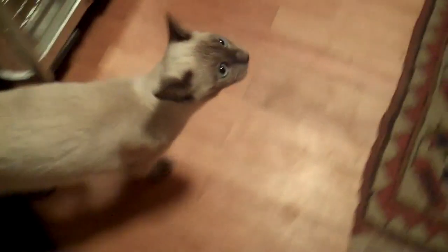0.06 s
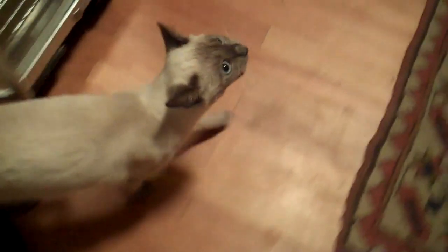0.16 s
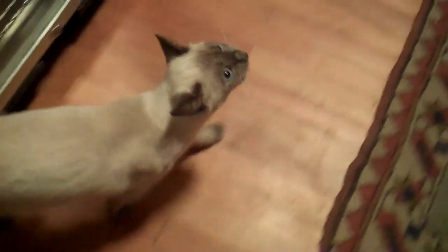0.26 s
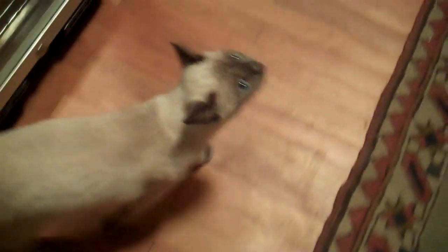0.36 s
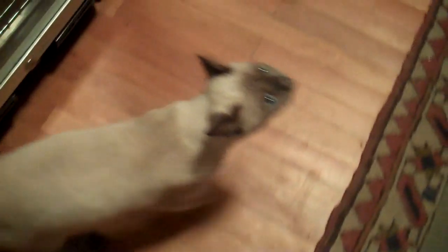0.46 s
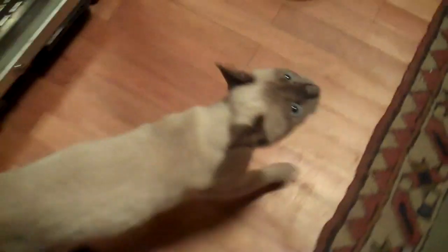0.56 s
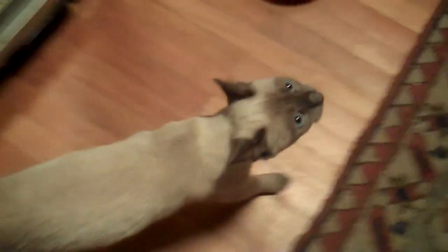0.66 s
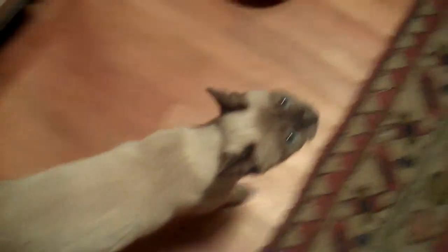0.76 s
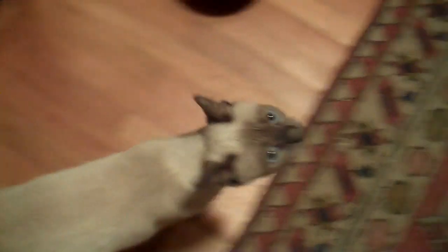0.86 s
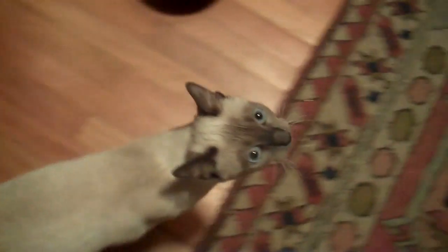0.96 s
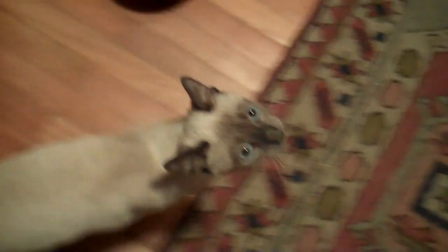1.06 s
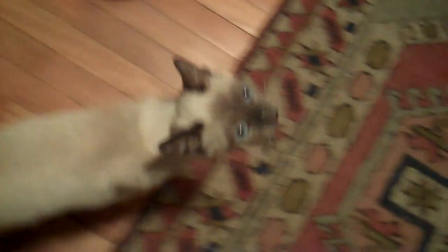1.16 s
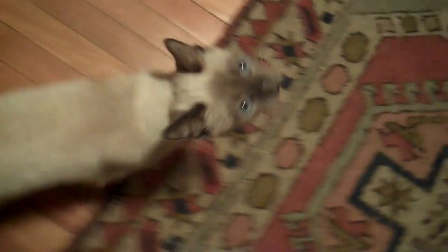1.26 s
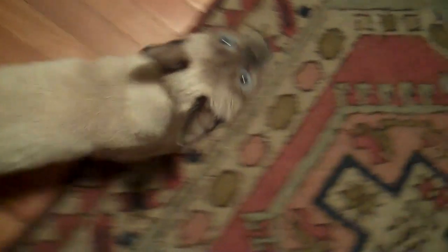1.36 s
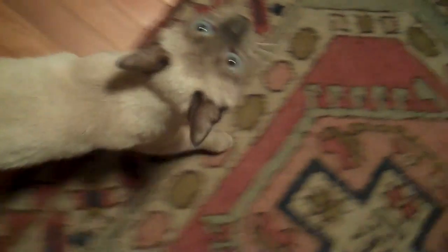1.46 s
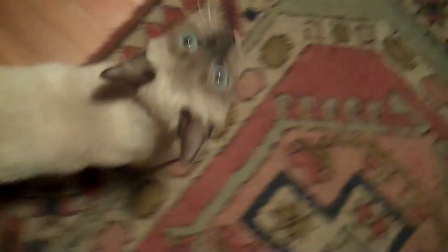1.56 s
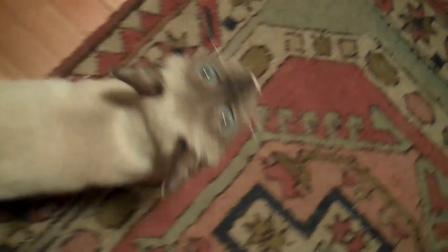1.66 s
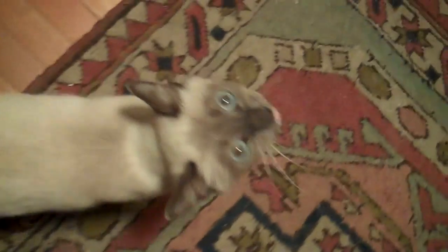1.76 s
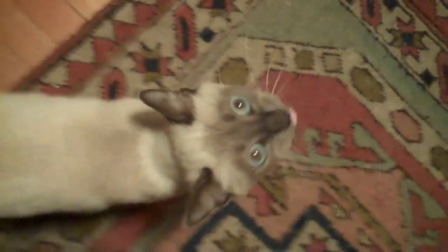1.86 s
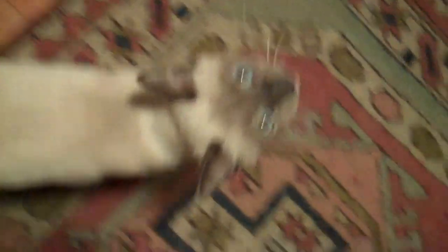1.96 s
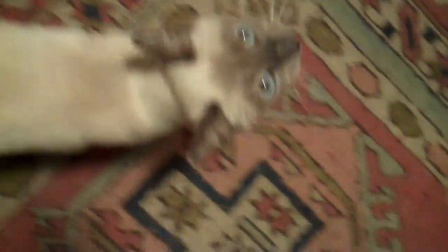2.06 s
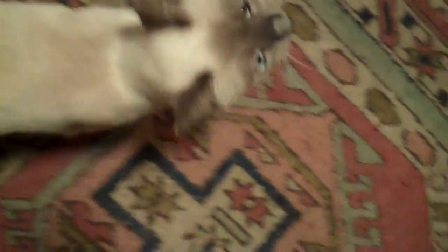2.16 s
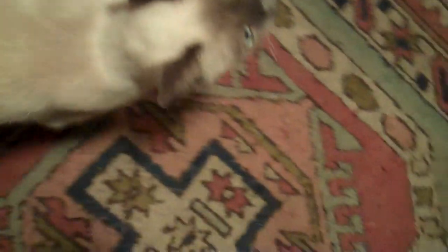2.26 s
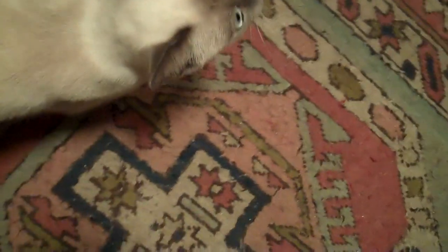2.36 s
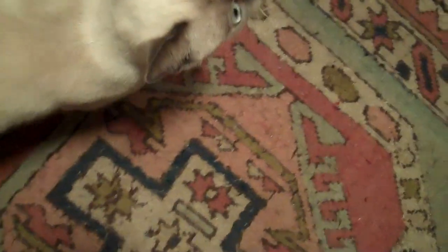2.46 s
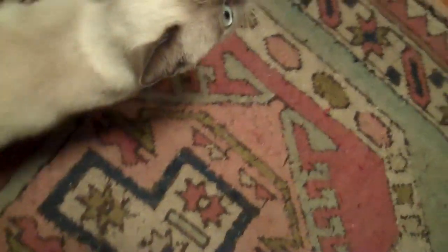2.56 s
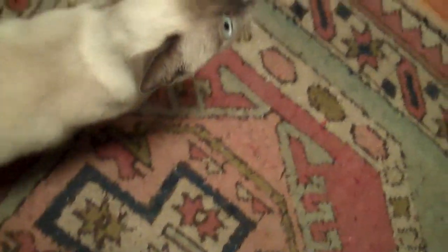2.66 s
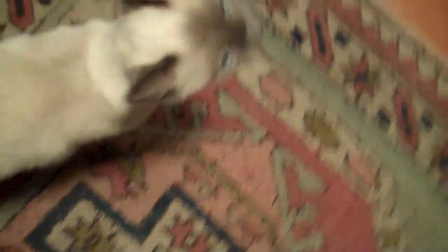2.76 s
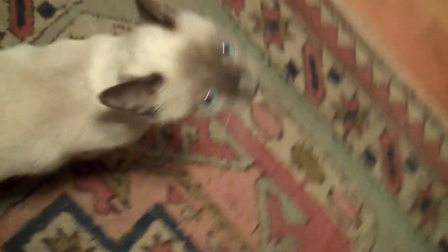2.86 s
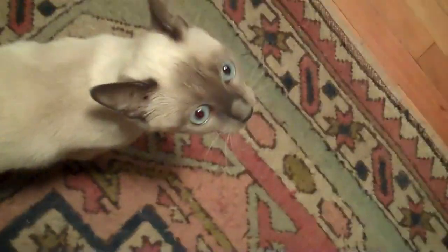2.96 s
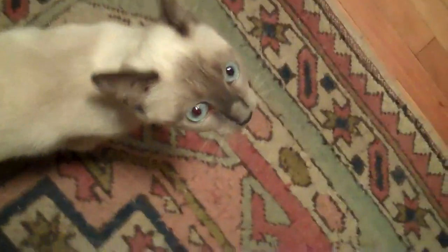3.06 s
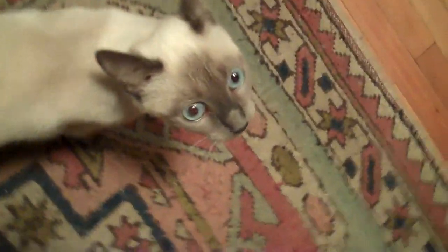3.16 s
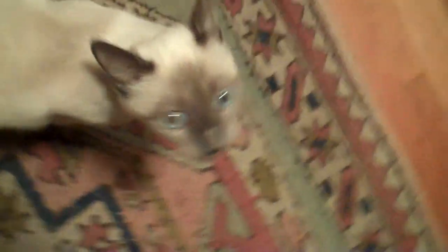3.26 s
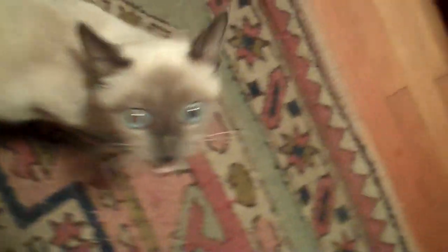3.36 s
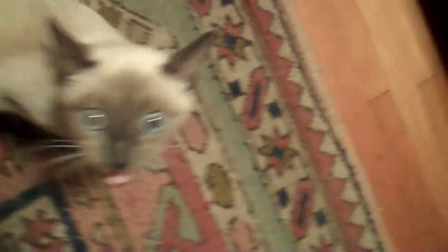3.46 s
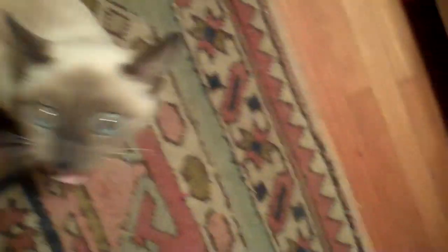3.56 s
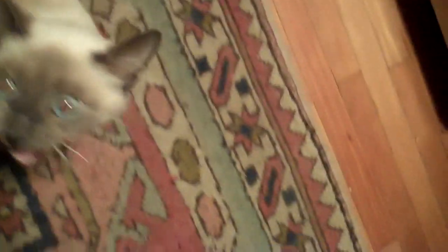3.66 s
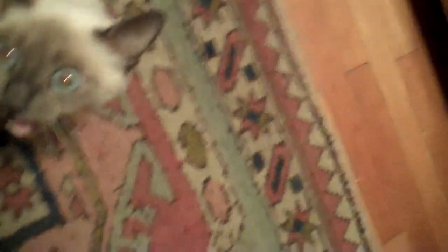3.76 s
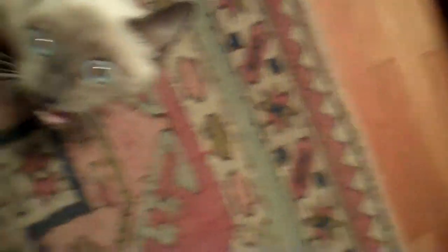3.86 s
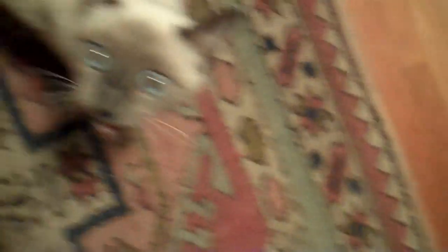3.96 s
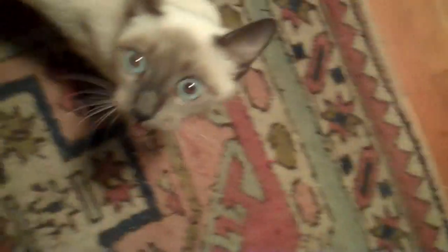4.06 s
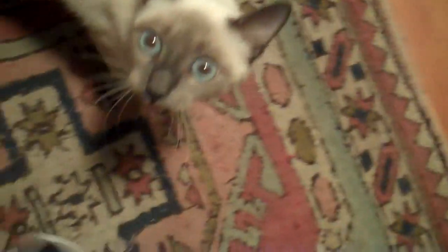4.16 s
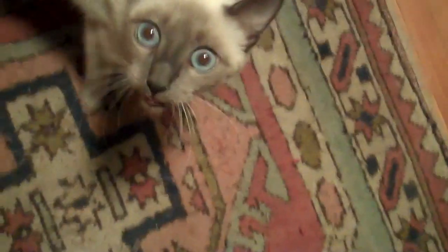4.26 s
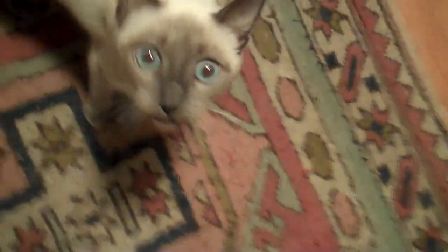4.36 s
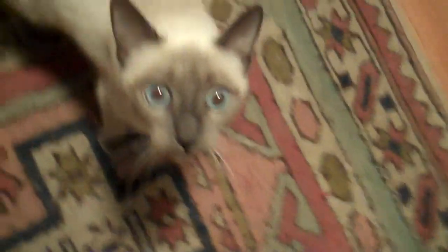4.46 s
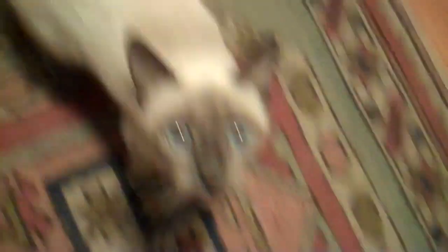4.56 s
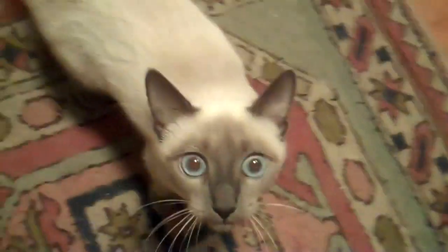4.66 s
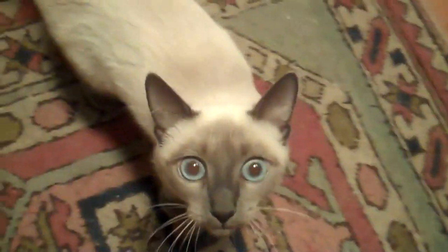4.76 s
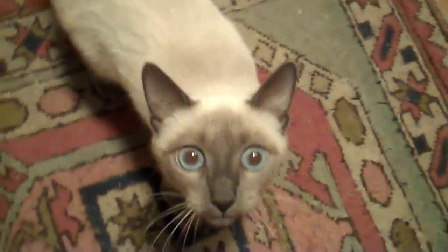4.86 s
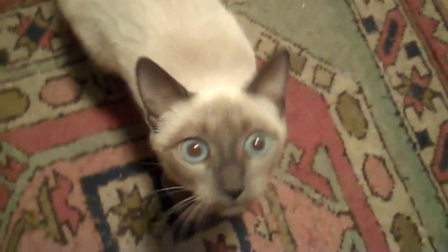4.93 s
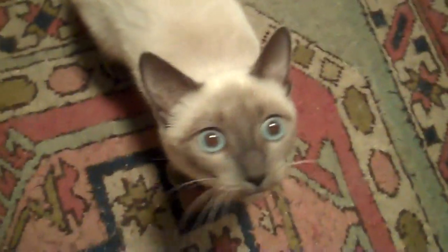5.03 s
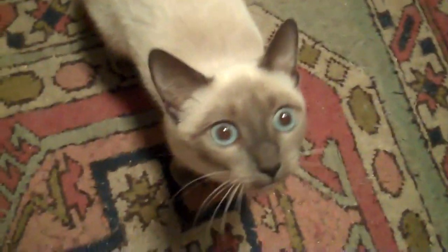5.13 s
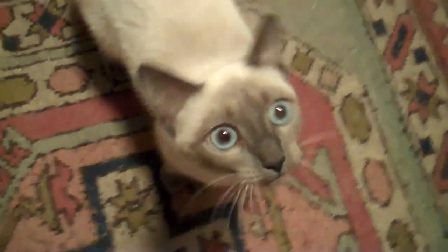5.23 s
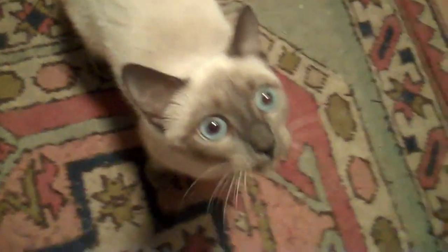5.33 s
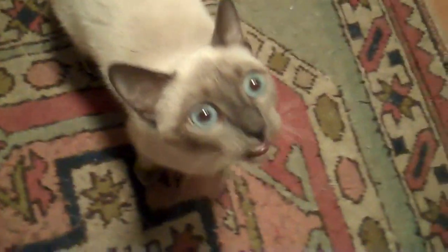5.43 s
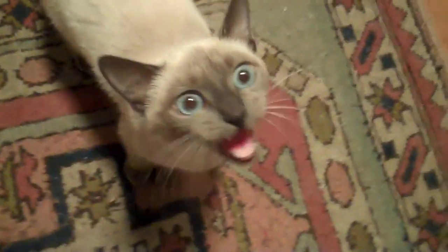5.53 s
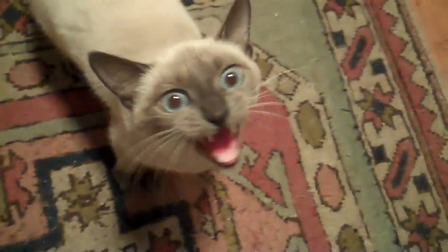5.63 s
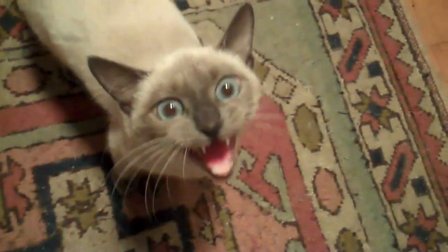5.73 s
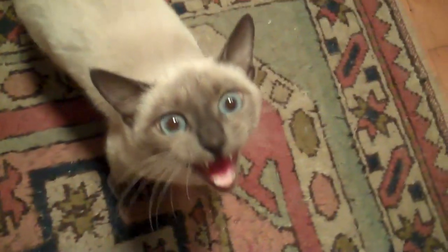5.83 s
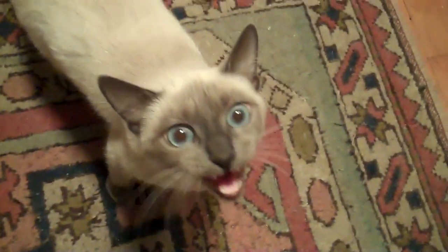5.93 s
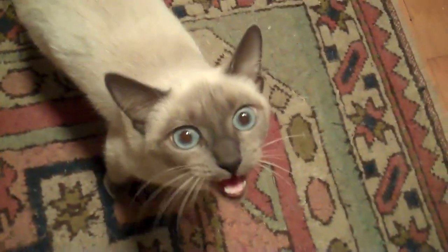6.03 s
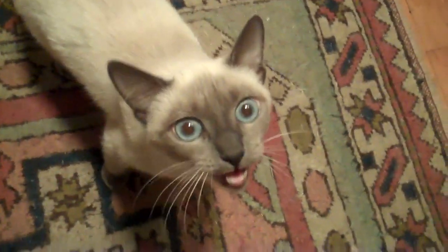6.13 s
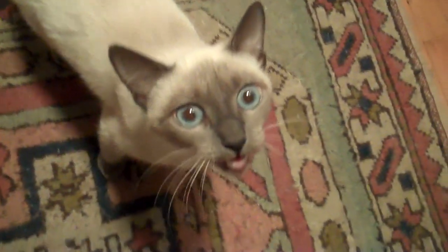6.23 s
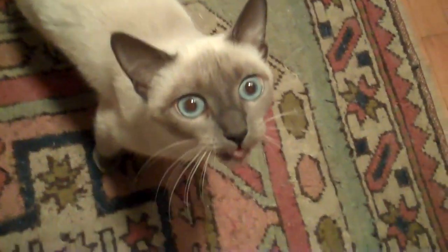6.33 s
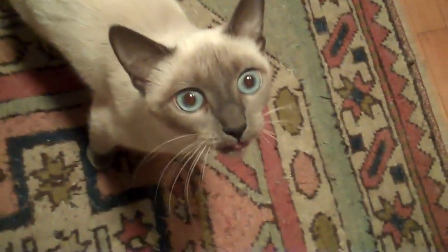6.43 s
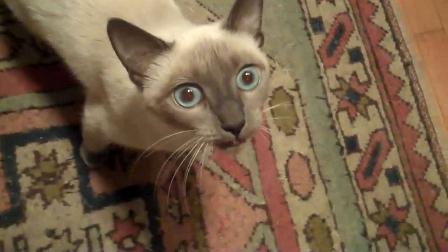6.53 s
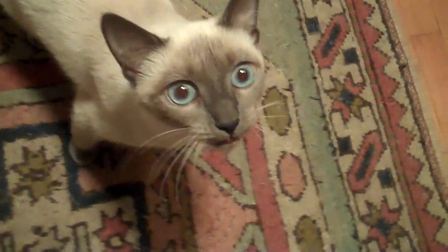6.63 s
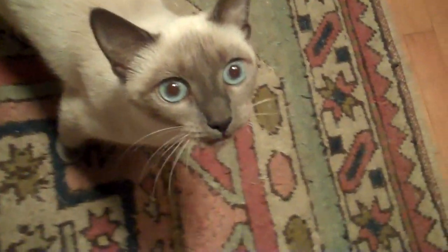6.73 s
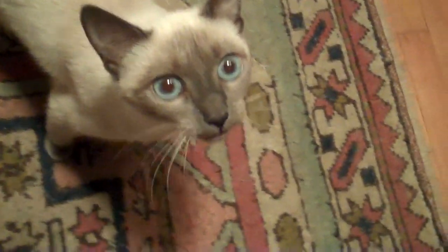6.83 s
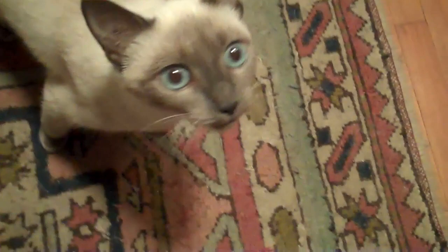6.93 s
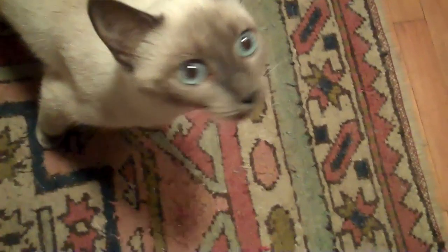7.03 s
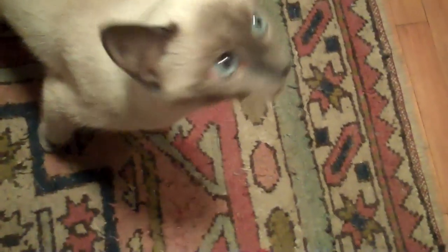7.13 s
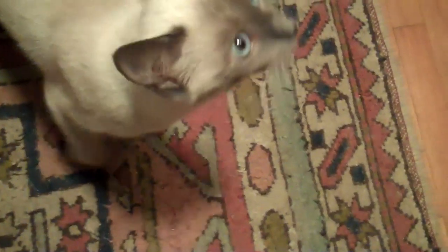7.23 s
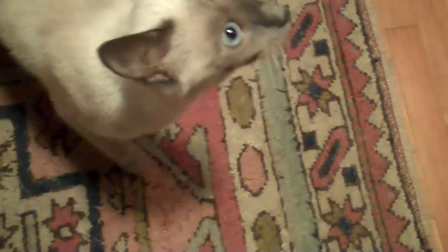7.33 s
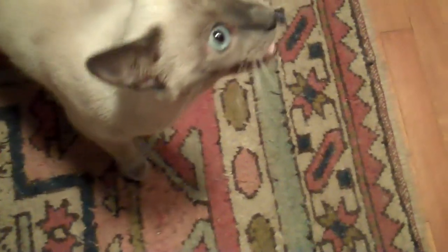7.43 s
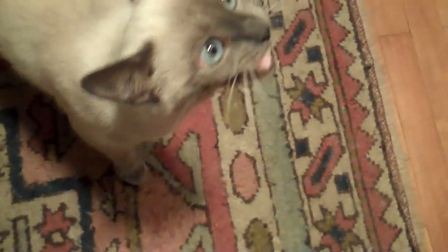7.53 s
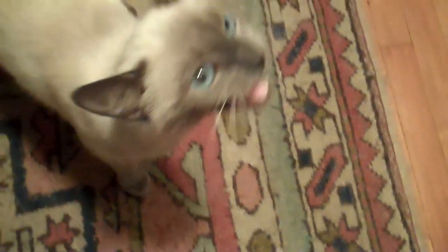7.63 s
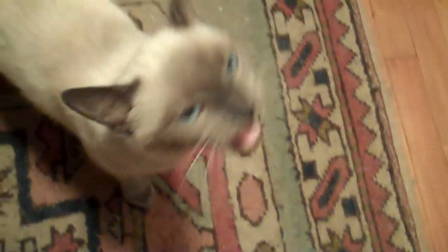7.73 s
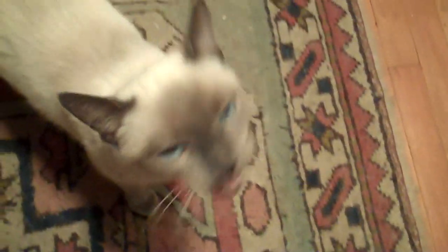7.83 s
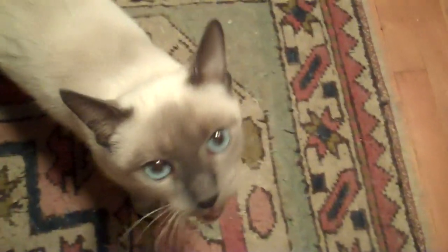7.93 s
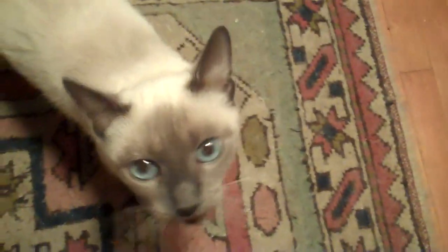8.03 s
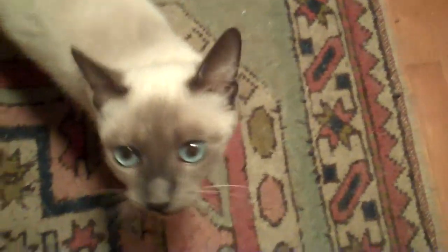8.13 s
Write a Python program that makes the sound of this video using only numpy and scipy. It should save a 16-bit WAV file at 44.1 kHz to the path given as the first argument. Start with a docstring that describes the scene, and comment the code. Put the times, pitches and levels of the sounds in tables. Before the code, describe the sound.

A small quiet room with faint low tone and a steady, airy microphone hiss. After a soft bump at the very start, a nearby cat meows from 0.1 to 1.1 seconds: high, bright and nasal at first, then a long thin whine rising slightly through a nearly closed mouth. Grainy rustles brush by around 0.5 to 0.75, and a dull scuff follows at 1.35. A second, similarly plaintive meow runs from 1.6 to 2.5, ending with a slight crack and a faint bump. After a pause and a tick at 3.4, a louder, fuller meow lasts until 4.35. Tiny rustles and ticks surround its end, and the hiss eases slightly. Another tick comes at 4.7. The fourth meow, 5.6 to 6.45, opens sharply and closes into a whine, followed by a light high tick. A crisp click at 7.5 starts the fifth, rising thinly until 8.2, with brief room reflections.

```python
"""Small, quiet room: a cat meows five times, among soft rustles, scuffs, bumps and ticks.
Each meow is a sum of pitch harmonics through three moving resonances, with puffs of air:
it opens bright and loud, then trails off in a thin whine through a nearly shut mouth.
The small noises are enveloped noise bands. Each meow, and the small noises together, get their own
random reflections with the same decay times. Room tone, faint hum and two microphones' hiss lie underneath."""
import sys
import numpy as np
from scipy import signal
from scipy.fft import rfft, irfft, next_fast_len
from scipy.io import wavfile

SR = 44100
rng = np.random.default_rng(int(sys.argv[2]) if len(sys.argv) > 2 else 0)


def digitize_waveform(pressure):
    """Quantize a signal to 16-bit integers and store it at the path in sys.argv[1].

    Rows of a 2-D input are taken as channels; values are limited to [-1, 1].
    """
    field = np.atleast_2d(pressure).T
    bounded = np.clip(field, -1, 1)
    quanta = np.round(bounded * 32767).astype(np.int16)
    wavfile.write(sys.argv[1], SR, quanta)


N = 361179
TIME_S = np.arange(N) / SR

# Room tone spectrum. Each row: frequency in Hz, relative density in dB per Hz.
ROOM_TONE_SPECTRUM = [(20, -1), (48, -14), (90, -3), (200, -6), (290, 2), (370, 4), (470, -0.5), (700, 0),
                      (1100, -7), (2500, -11.5), (6000, -24)]
# Hiss spectrum of each microphone. Each row: frequency in Hz, relative density in dB per Hz.
LEFT_HISS_SPECTRUM = [(100, -41), (2300, -25), (3700, -14.5), (5200, -16.5), (6100, -9.5), (6900, -1.5),
                      (7800, -1.5), (8600, -7.5), (10200, -5.5), (10900, -13.5), (12400, -16), (13000, -19),
                      (14200, -21.5)]
RIGHT_HISS_SPECTRUM = [(100, -22), (2300, -20), (3700, -9.5), (5000, -9), (5950, 0.5), (7000, -9),
                       (7900, -10), (8600, -12.5), (10300, -13), (10900, -37), (12300, -25), (12900, -51)]
# The hiss eases once. Values: centre in seconds, logistic time constant in seconds, extra level before in dB.
HISS_EASING = (4.35, 0.041, 2.6)
# Hum level. Values: steady dB, early extra dB, centre of the extra in seconds, its half-width (1/e) in seconds,
# fade-in centre in seconds.
HUM_LEVEL = (-74.5, 7.5, 0.5, 3.3, 1.6)
# Reverberation. Each row: frequency in Hz, 60 dB decay time in seconds.
ROOM_DECAY = [(200, 0.11), (1000, 0.49), (3000, 0.45), (8000, 0.098)]
# Microphone mismatch. Each row: frequency in Hz, left minus right in dB.
MIC_MISMATCH = [(700, -2), (2300, -2.5), (4200, -3), (5700, -14.5), (7200, 12.5), (9000, 6.5)]
# Light bumps and ticks. Each row: start in seconds, level in dB, centre in Hz, decay in seconds.
BUMPS_AND_TICKS = [(.02, -42, 366, 0.046), (2.495, -45, 790, .015), (3.372, -34, 1400, 0.0076),
                   (4.255, -33.5, 900, 0.0073), (4.333, -41.5, 1170, 0.057), (4.728, -39, 810, 0.007),
                   (6.485, -39, 5000, 0.019), (7.484, -32, 5650, 0.0025)]
# Where the cat is, one row a meow: reflections over direct sound in dB, left minus right in dB,
# lead of the left microphone in ms.
CAT_PLACES = [(-5, 1, 0.024), (-9, 2, 0.031), (-11, 1.5, -0.031), (-12, 2, -0.028), (-11.5, 1, 0.03)]
# Pitch, one curve a meow. Each point: time in seconds, pitch in Hz.
PITCH_CURVES = [
    [(0.105, 847), (0.234, 869), (0.245, 896.3), (0.383, 928.8), (0.398, 897), (0.551, 857.4), (0.608, 958),
     (0.625, 908), (0.734, 942), (0.776, 997.4), (1.034, 1004), (1.076, 927)],
    [(1.57, 845), (1.611, 743), (1.628, 793), (1.656, 768), (1.676, 823.4), (1.81, 846.4), (1.838, 790),
     (1.95, 990), (2.074, 858), (2.285, 879), (2.329, 820), (2.51, 977)],
    [(3.43, 746), (3.488, 699), (3.551, 759), (3.61, 824.5), (3.698, 825.8), (3.804, 772), (3.841, 785),
     (3.953, 740.5), (3.994, 799.3), (4.242, 827.3), (4.324, 867), (4.353, 778)],
    [(5.606, 774), (5.648, 714), (5.677, 699), (5.734, 759.3), (5.87, 774.5), (5.94, 760), (5.951, 744),
     (6.013, 779.6), (6.021, 809), (6.328, 846.7), (6.438, 919), (6.464, 731.0)],
    [(7.5, 805), (7.571, 717), (7.673, 759), (7.758, 762.6), (7.775, 794), (7.848, 799.7), (7.879, 817.1),
     (7.939, 787), (7.957, 846.2), (8.045, 903), (8.125, 900), (8.189, 960)],
]
# Mouth resonance level, one curve a meow. Each point: time in seconds, level in dB.
MOUTH_LEVEL_CURVES = [
    [(0.105, -46), (0.236, -25), (0.26, -31), (0.314, -23.5), (0.539, -42), (0.631, -59), (0.672, -46),
     (0.857, -68), (0.984, -48), (1.0, -58), (1.076, -58)],
    [(1.57, -43), (1.613, -28.5), (1.746, -29), (1.85, -24), (1.863, -47), (1.909, -40), (1.925, -67),
     (2.052, -36.5), (2.296, -41), (2.339, -32), (2.51, -58.5)],
    [(3.43, -47), (3.458, -26.5), (3.597, -23.5), (3.623, -11.5), (3.67, -18), (3.698, -28), (3.735, -20),
     (3.862, -31.5), (4.083, -42.5), (4.321, -39), (4.353, -51)],
    [(5.606, -44), (5.631, -22.5), (5.675, -26), (5.776, -22), (5.828, -16), (5.859, -20.5), (6.006, -30.5),
     (6.036, -45.7), (6.436, -47), (6.45, -67), (6.464, -56)],
    [(7.5, -46), (7.588, -25.5), (7.633, -31), (7.649, -18), (7.817, -18.5), (7.854, -19), (7.869, -25),
     (7.934, -24.5), (7.997, -40.5), (8.169, -44), (8.189, -63)],
]
# Articulation, one row a meow: jaw widest in seconds, mouth shut in seconds, voice break in seconds,
# mouth resonance when widest in Hz, the same in the whine in Hz, middle resonance in Hz, its nominal level in dB,
# upper resonance's top in Hz, its nominal level in dB, fundamental at first in dB, the same in the whine in dB,
# its slope after the mouth shuts in dB/s.
ARTICULATIONS = [(0.29, 0.563, 0.8, 2660, 2000, 3400, -33.5, 6600, -40.5, -40, -36, -6),
                 (1.746, 1.868, 1.88, 2190, 1660, 3350, -33, 6900, -30, -38, -35.5, -0.5),
                 (3.64, 3.86, 3.9, 2286, 1350, 3280, -25, 8050, -29, -37.5, -36.5, 3.5),
                 (5.833, 5.96, 5.96, 2143, 1850, 3210, -26, 7350, -25, -39, -34.5, 7.5),
                 (7.767, 7.963, 7.935, 2194, 2130, 3200, -26.5, 7020, -26.5, -49, -31, 11)]
# Soft rustles as cat and camera move. Each row: start in seconds, length in seconds, level in dB.
RUSTLE_EVENTS = [(0.509, 0.069, -37), (0.599, 0.12, -36), (0.673, 0.086, -38), (4.069, 0.1, -45),
                 (4.203, 0.038, -43), (4.355, 0.11, -45)]
# Dull scuffs. Each row: start in seconds, level in dB, decay in seconds.
SCUFF_EVENTS = [(1.345, -38, 0.086)]

HUM_HZ = 120
START_HZ, CLOSING_HZ = 1933, 1535  # mouth resonance at voice start and just before the lips meet
CLOSE_S = 0.021  # logistic time constant of the mouth shutting
SCOOP_S, SCOOP_WIDTH_S, SCOOP_HZ, SCOOP_DB = 0.069, 0.035, -150, -4  # mouth resonance and fundamental dip
FILL_S = 0.018  # fundamental moves to its whine level around the widest jaw
CHOKE_S, CHOKE_DB = 0.039, -5.5  # fundamental dips at the voice break
RELEASE_S, RELEASE_DB = 0.0089, -8.5  # fundamental gives out as the voice stops
GAPE_LAG_S, GAPE_S, GAPE_DB = 0.04, 0.062, -7.5  # middle resonance dips after the widest jaw
UPPER_START_DB, UPPER_ATTACK_S = -6, 0.022
UPPER_HZ, UPPER_CURVE = 5630, 1.1  # upper resonance climbs from here, ever faster
WHINE_MIDDLE_DB, WHINE_UPPER_DB = -28, -25  # what the shut mouth leaves, re nominal level
HOLLOW_HZ, HOLLOW_WIDTH_HZ, HOLLOW_DB = 3270, 180, -8.5
JAW_CRACK_LEAD_S, JAW_CRACK = 0.058, 0.28  # before the mouth shuts; strength 0-1
END_CRACK_LEAD_S, END_CRACK = 0.012, 1  # before the voice stops
CRACK_S = 0.012
RUSTLE_HZ, RUSTLE_OCTAVES = 5350, 1
SCUFF_HZ, SCUFF_OCTAVES = 2920, 0.78
EDGE_HZ = 14180


def gain_of(db):
    """Decibels to amplitude."""
    return 10 ** (np.asarray(db) / 20)


def evened(x):
    """Scales to rms 1."""
    return x / np.sqrt(np.mean(x ** 2) + 1e-20)


def read(points, hz):
    """Interpolates a spectrum on a log-frequency axis."""
    f, value = np.transpose(points)
    return np.interp(np.log(hz + 1), np.log(f + 1), value)


def add(mix, start_s, sound):
    """Mixes a sound in place at start_s."""
    part = mix[max(round(start_s * SR), 0):][:len(sound)]
    part += sound[:len(part)]


def coloured(x, gain):
    """Filters by a gain given as a function of frequency."""
    size = next_fast_len(x.shape[-1])
    spectrum = rfft(x, size) * gain(np.fft.rfftfreq(size, 1 / SR))
    return irfft(spectrum, size)[..., :x.shape[-1]]


def noise(size, gain):
    """Coloured noise of rms 1."""
    return evened(coloured(rng.standard_normal(size), gain))


def waver(size, rate_hz):
    """Random wandering of rms 1, up to about rate_hz."""
    return noise(size, lambda f: 1 / (1 + (f / rate_hz) ** 4))


def band(size, centre_hz, octaves):
    """Noise in a bell around centre_hz, rolled off above 8.5 kHz."""
    def gain(f):
        offset = np.log2((f + 1) / centre_hz) / octaves
        return 1 / (1 + offset ** 2 / 2) ** 2 / (1 + (f / 8500) ** 8)
    return noise(size, gain)


def bell(t, at_s, width_s):
    """A smooth bump of height 1 around at_s."""
    return np.exp(-((t - at_s) / width_s) ** 2)


def step(t, at_s, constant_s):
    """A logistic rise from 0 to 1 around at_s."""
    return .5 + .5 * np.tanh((t - at_s) / constant_s / 2)


def room_tone(level_db=-55.5, apart_db=-11):
    """Low noise common to both microphones, plus a weaker part in opposite phase."""
    common, opposed = [noise(N, lambda f: gain_of(read(ROOM_TONE_SPECTRUM, f))) for _ in range(2)]
    return gain_of(level_db) * (common + gain_of(apart_db) * np.outer([1, -1], opposed))


def hum():
    """A sine that fades in at about 1.6 s, then slowly weakens to a steady level."""
    steady_db, extra_db, centre_s, width_s, fade_in_s = HUM_LEVEL
    level_db = steady_db + extra_db * bell(TIME_S, centre_s, width_s)
    envelope = np.sqrt(2) * gain_of(level_db) * step(TIME_S, fade_in_s, 0.1)
    return envelope * np.sin(2 * np.pi * HUM_HZ * TIME_S)


def microphone_hiss(spectrum, level_db, ripple_db=3.5):
    """One microphone's own noise, its spectrum rippled at random every 50 Hz."""
    grid_hz = np.arange(0, SR / 2, 50)
    ripple = ripple_db * rng.standard_normal(len(grid_hz))
    return gain_of(level_db) * noise(N, lambda f: gain_of(read(spectrum, f) + np.interp(f, grid_hz, ripple)))


def hiss(left_db=-37, right_db=-41.5, flutter_db=0.8):
    """Independent hiss in each microphone, with a shared flutter and one easing of level."""
    pair = np.array([microphone_hiss(LEFT_HISS_SPECTRUM, left_db),
                     microphone_hiss(RIGHT_HISS_SPECTRUM, right_db)])
    at_s, constant_s, before_db = HISS_EASING
    level_db = before_db * (1 - step(TIME_S, at_s, constant_s)) + flutter_db * waver(N, 6)
    return pair * gain_of(level_db)


def background():
    """Room tone, hum and hiss summed."""
    return room_tone() + hum() + hiss()


def room(x, wet_db, ring_s=.4, taps_per_s=2000):
    """Direct sound plus freshly drawn, decaying reflections; both microphones share the long waves."""
    slots = int(ring_s * taps_per_s)
    at = ((np.arange(slots) + 5 + rng.random((2, slots))) * SR / taps_per_s).astype(int)
    taps = np.zeros((2, SR))
    np.put_along_axis(taps, np.minimum(at, SR - 1), rng.choice([-1., 1.], at.shape), 1)
    hz, t, z = signal.stft(taps, SR, nperseg=256)
    same = (1 / (1 + (hz / 1900) ** 2))[:, None]
    z[1] = same * z[0] + np.sqrt(1 - same ** 2) * z[1]
    decay = gain_of(-60 * t / read(ROOM_DECAY, hz)[:, None])
    tail = signal.istft(z * decay, SR)[1]
    tail = tail / np.linalg.norm(tail[0])
    wet = signal.oaconvolve(x[None], tail, axes=1)[:, :len(x)]
    return (x + gain_of(wet_db) * wet) / np.sqrt(1 + gain_of(2 * wet_db))


def struck_noise(level_db, centre_hz, octaves, decay_s, attack_s):
    """A noise band with exponential attack and decay."""
    t = TIME_S[:SR // 3]
    envelope = np.exp(-t / decay_s) * (1 - np.exp(-t / attack_s))
    return gain_of(level_db) * band(len(t), centre_hz, octaves) * envelope


def bumps():
    """Bumps and ticks: wide noise bands, near-instant attack."""
    out = np.zeros(N)
    for start_s, level_db, centre_hz, decay_s in BUMPS_AND_TICKS:
        add(out, start_s, struck_noise(level_db, centre_hz, 1.5, decay_s, 0.00023))
    return out


def resonance(hz, centre_hz, width_hz):
    """A resonance in a vocal tract that has one narrow hollow and passes little above 8.3 kHz."""
    hollow = gain_of(HOLLOW_DB * np.exp(-((hz - HOLLOW_HZ) / HOLLOW_WIDTH_HZ) ** 2))
    return hollow / (1 + ((hz - centre_hz) / width_hz) ** 2) / np.sqrt(1 + (hz / 8300) ** 24)


def articulation(t, widest_s, shut_s, break_s, wide_hz, whine_hz, middle_hz, middle_db, top_hz, upper_db,
                 first_db, whine_db, slope_db_per_s, skew=0.97, opening=0.52):
    """One opening and shutting of the jaw sets the fundamental's level and the resonances."""
    age = t - t[0]
    closed = step(t, shut_s, CLOSE_S)
    progress = np.clip(age / (shut_s - t[0]), 0, 1)
    scoop = bell(age, SCOOP_S, SCOOP_WIDTH_S)

    base_db = first_db + (whine_db - first_db) * step(t, widest_s, FILL_S)
    base_db = base_db + slope_db_per_s * np.maximum(t - shut_s, 0)
    base_db = base_db + SCOOP_DB * scoop + CHOKE_DB * bell(t, break_s, CHOKE_S)
    base_db = base_db + RELEASE_DB * bell(t, t[-1], RELEASE_S)

    opened = (age / (widest_s - t[0])) ** opening
    rising_hz = START_HZ + (wide_hz - START_HZ) * opened + SCOOP_HZ * scoop
    falling_hz = np.interp(t, [widest_s, shut_s], [wide_hz, CLOSING_HZ])
    open_hz = np.where(t < widest_s, rising_hz, falling_hz)
    mouth_hz = open_hz * (1 - closed) + whine_hz * closed

    gape = gain_of(GAPE_DB * bell(t, widest_s + GAPE_LAG_S, GAPE_S))
    middle = np.sin(np.pi * progress ** skew) ** 2 * gape + gain_of(WHINE_MIDDLE_DB)

    growth = gain_of(UPPER_START_DB * (1 - progress)) * (1 - np.exp(-age / UPPER_ATTACK_S))
    upper = growth * (1 - closed) + gain_of(WHINE_UPPER_DB)
    upper_hz = UPPER_HZ + (top_hz - UPPER_HZ) * progress ** UPPER_CURVE
    return (base_db, mouth_hz, middle_hz, middle_db + 20 * np.log10(middle),
            upper_hz, upper_db + 20 * np.log10(upper))


def meow(melody, loudness, gesture, mouth_width_hz=270, middle_width_hz=440, upper_width_hz=780,
         jitter=0.0036, tremor=0.0033, shimmer_db=1.73, air_db=-20, crack_jitter=0.022, crack_db=5,
         fade_s=0.0021):
    """Harmonics of the vocal folds pass three resonances; the lowest rises as the jaw opens."""
    t = np.arange(melody[0][0], melody[-1][0], 1 / SR)
    size = len(t)
    pitch_hz = np.interp(t, *np.transpose(melody))
    mouth_db = np.interp(t, *np.transpose(loudness))
    base_db, mouth_hz, middle_hz, middle_db, upper_hz, upper_db = articulation(t, *gesture)

    # the folds tremble slowly and scatter quickly, most where the voice cracks
    shut_s = gesture[1]
    crack = JAW_CRACK * bell(t, shut_s - JAW_CRACK_LEAD_S, CRACK_S)
    crack = crack + END_CRACK * bell(t, t[-1] - END_CRACK_LEAD_S, CRACK_S)
    unsettled = 1 + 4 * np.exp(-(t - t[0]) / 0.052)  # the voice takes a moment to steady
    scatter = jitter * np.sqrt(unsettled) + crack_jitter * crack
    pitch_hz = pitch_hz * (1 + tremor * unsettled * waver(size, 58) + scatter * waver(size, 192))
    angle = 2 * np.pi * np.cumsum(pitch_hz) / SR

    # a soft voice comes through a nearly shut mouth, which rings more narrowly
    mouth_width = mouth_width_hz * np.interp(mouth_db, [-42, -26], [.55, 1])
    mouth_db = mouth_db + crack_db * crack * waver(size, 280)  # uneven pulses
    k = np.arange(2, 13)[:, None]  # harmonic numbers above the fundamental
    power = 0
    for level_db, centre_hz, width_hz in [(mouth_db, mouth_hz, mouth_width),
                                          (middle_db, middle_hz, middle_width_hz),
                                          (upper_db, upper_hz, upper_width_hz)]:
        shape = resonance(k * pitch_hz, centre_hz, width_hz)
        shape = shape / np.linalg.norm(shape, axis=0)
        shimmer = shimmer_db * np.sqrt(unsettled) * waver(size, 25)
        power = power + (shape * gain_of(level_db + shimmer)) ** 2

    # each pulse rings on in the tract, so the higher harmonics lag
    lag = np.arctan((k * pitch_hz - mouth_hz) / mouth_width_hz) + 0.251 * k ** 2
    fundamental = gain_of(base_db) * np.cos(angle)
    harmonics = (np.sqrt(power) * np.cos(k * angle - lag)).sum(0)
    voice = np.sqrt(2) * (fundamental + harmonics)
    # air escapes in a puff with every cycle
    air = band(size, 7200, 0.63) * (1 + np.cos(angle)) * gain_of(upper_db + air_db)
    edges = np.clip(np.minimum(t - t[0], t[-1] - t) / fade_s, 0, 1)
    return t[0], (voice + air) * edges


def cat():
    """Five meows, each with its own room level, balance and arrival lead."""
    out = np.zeros((2, N))
    for melody, loudness, gesture, place in zip(PITCH_CURVES, MOUTH_LEVEL_CURVES, ARTICULATIONS, CAT_PLACES):
        wet_db, balance_db, lead_ms = place
        start_s, voice = meow(melody, loudness, gesture)
        heard = room(np.pad(voice, (0, SR // 2)), wet_db)
        for track, sound, side in zip(out, heard, [.5, -.5]):
            # half the lead on each side, in opposite directions
            shifted = coloured(sound, lambda f: np.exp(2j * np.pi * f * side * lead_ms / 1000))
            add(track, start_s, shifted * gain_of(side * balance_db))
    return out


def rustles(grain_db=6.5):
    """Grainy noise bands that swell and fade."""
    out = np.zeros(N)
    for start_s, length_s, level_db in RUSTLE_EVENTS:
        size = int(length_s * SR)
        swell = np.sqrt(np.hanning(size))
        grain = gain_of(level_db + grain_db * waver(size, 78))
        add(out, start_s, swell * grain * band(size, RUSTLE_HZ, RUSTLE_OCTAVES))
    return out


def scuffs():
    """Duller noise bands that start at once and die away."""
    out = np.zeros(N)
    for start_s, level_db, decay_s in SCUFF_EVENTS:
        add(out, start_s, struck_noise(level_db, SCUFF_HZ, SCUFF_OCTAVES, decay_s, 0.0048))
    return out


def movement():
    """Bumps, rustles and scuffs under one set of room reflections."""
    return room(bumps() + rustles() + scuffs(), wet_db=-2)


def scene():
    """Cat and small noises reach two mismatched microphones, over the background."""
    def mismatch(f):
        return gain_of(np.outer([.5, -.5], read(MIC_MISMATCH, f)))
    return coloured(cat() + movement(), mismatch) + background()


def record(dry):
    """Steep low-pass: a linear-phase FIR at the recorder's band limit."""
    taps = signal.firwin(801, EDGE_HZ, window=("kaiser", 9), fs=SR)
    return signal.oaconvolve(dry, taps[None], "same")


dry = scene()
out = record(dry)
digitize_waveform(out)
```